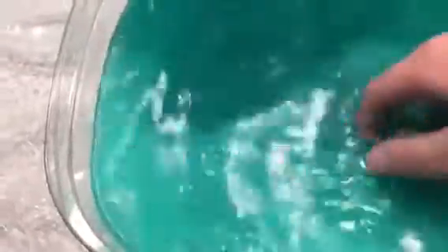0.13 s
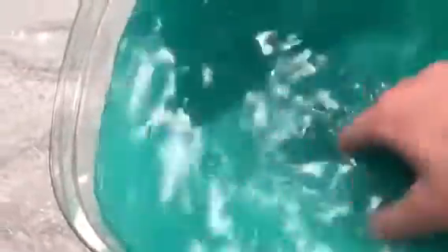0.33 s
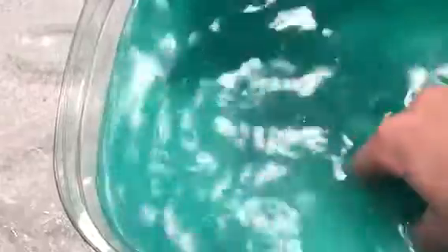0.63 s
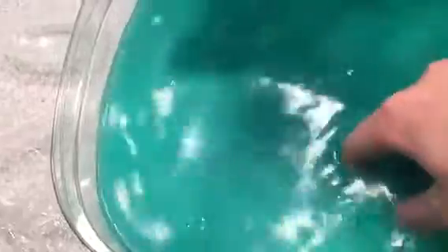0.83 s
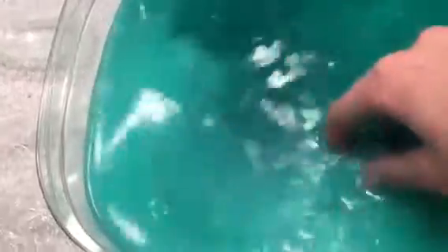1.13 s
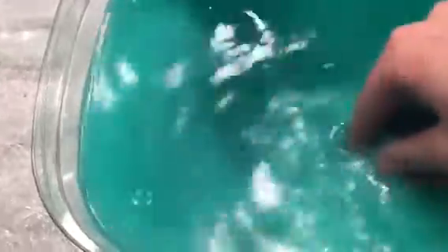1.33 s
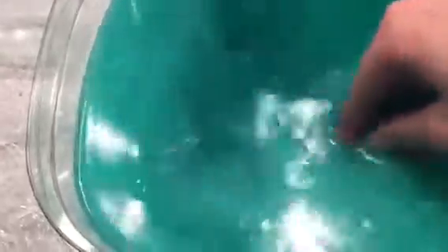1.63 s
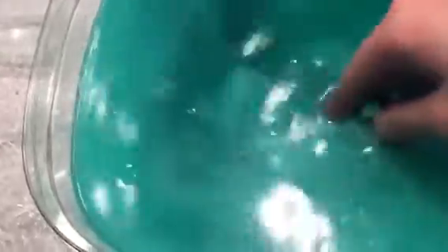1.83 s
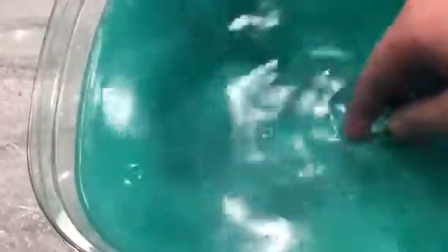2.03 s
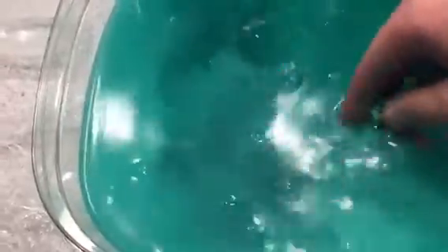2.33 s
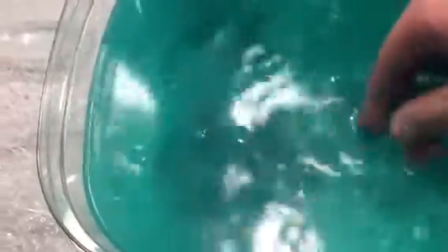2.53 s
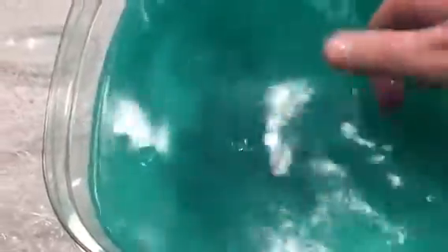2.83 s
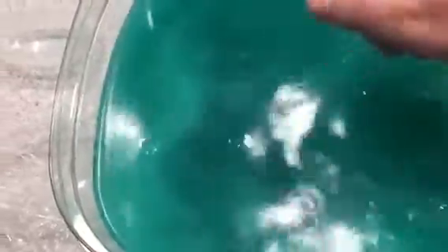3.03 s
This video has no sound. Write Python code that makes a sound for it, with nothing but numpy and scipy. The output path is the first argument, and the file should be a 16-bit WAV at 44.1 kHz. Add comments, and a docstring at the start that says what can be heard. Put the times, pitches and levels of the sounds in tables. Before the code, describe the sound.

A bath bomb fizzes as a steady bright hiss in a glass bowl; fingers stir short bubbly sloshes and plops, then lift out with high drips. Quiet room, one close microphone, mono.

```python
"""From the start a bath bomb fizzes in a glass bowl of water, in a quiet room: filtered noise and a low hum.
Soon fingers stir the water. Random bursts ring in resonances to make short sloshes of bubbles, gliding sines
make single plops, and narrow bands of noise make air pockets sing, or the bowl's tone near 1 kHz ring on, for a
moment. At the end the hand lifts out, with a thin trickle of drips: more bursts and high plops. One microphone
hears it all; both channels carry the same sound."""
import sys
import numpy as np
from scipy import signal
from scipy.io import wavfile
from scipy.ndimage import uniform_filter1d

SR = 44100
rng = np.random.default_rng(int(sys.argv[2]) if len(sys.argv) > 2 else 0)


def bounce(signal):
    """Save signal as a 16-bit WAV file at the path given by the first command-line argument."""
    frames = np.transpose(np.atleast_2d(signal))
    limited = np.clip(frames, -1, 1)
    pcm = np.round(limited * 32767).astype(np.int16)
    wavfile.write(sys.argv[1], SR, pcm)


N = 141120  # samples: 3.2 s

EVEN_HZ = 9000  # around here and above, the hiss becomes less patchy
BURSTS_PER_S, BURST_SPREAD_DB = 2000, 2.5
SKIRT = 1.6  # width of the second resonance, as a multiple of the first


def amp(db):
    """Turn decibels into a plain factor."""
    return 10 ** (np.asarray(db) / 20)


def evened(x):
    """Scale a sound to an average (RMS) strength of 1."""
    return x / np.sqrt(np.mean(x ** 2) + 1e-20)


def read(points, hz):
    """Read a curve between its points, on a logarithmic pitch scale."""
    f, value = np.transpose(points)
    return np.interp(np.log(hz + 1), np.log(f + 1), value)


def add(mix, start_s, sound):
    """Mix a sound in at its start time, cut off at the end of the mix."""
    part = mix[round(start_s * SR):][:len(sound)]
    part += sound[:len(part)]


def resonate(x, hz, width):
    """A resonance of gain 1 that may follow a pitch curve: shift down to 0 Hz, smooth, shift back."""
    turn = np.exp(2j * np.pi * np.cumsum(hz * np.ones(len(x))) / SR)
    r = np.exp(-np.pi * width / SR)
    smoothed = signal.lfilter([1 - r], [1, -r], x / turn)
    return 2 * (turn * smoothed).real


def noise(field_db, patchy_db):
    """Random short spectra, shaped over pitch and time, with small patches that even out in the treble."""
    hz = np.fft.rfftfreq(1024, 1 / SR)[:, None]
    t = np.arange(N // 256 + 5) * 256 / SR
    a, b, patches = rng.standard_normal((len(t), 513, 3)).T
    patches = uniform_filter1d(patches, size=5, axis=0)  # blur over pitch
    patches = evened(uniform_filter1d(patches, size=12, axis=1))  # blur over time
    patches_db = patchy_db * patches / (1 + (hz / EVEN_HZ) ** 2)
    spectra = (a + 1j * b) * amp(field_db(hz, t) + patches_db)
    return signal.istft(spectra, nperseg=1024, noverlap=768)[1][:N]


def clicks(per_s, spread_db):
    """Random bubble bursts of either sign; a few are large."""
    extra_db = spread_db * np.minimum(rng.exponential(1, N), 4)
    size = amp(extra_db) * rng.standard_normal(N)
    return size * (rng.random(N) < per_s / SR)


def ring(modes, strength):
    """Bubble bursts that follow a strength curve ring several resonances, each with its own bursts."""
    out = 0
    for hz, width, db in modes:
        bursts = strength * evened(clicks(BURSTS_PER_S, BURST_SPREAD_DB))
        tone = resonate(resonate(bursts, hz, width), hz, SKIRT * width)
        power = np.pi * width * SKIRT / (1 + SKIRT) / SR  # share of noise power that passes
        out = out + amp(db) * tone / np.sqrt(power)
    return out / np.linalg.norm(amp(np.transpose(modes)[2]))


# tone colour of the quiet room: f/Hz, relative level/dB per Hz
ROOM_COLOUR = [(25, -22), (53, -12), (82, -2), (114, -5.5), (243, -9.5), (331, -15), (372, -10),
               (452, -19.5), (2600, -17)]
ROOM_DB = -66.5
# hum of the room: f/Hz, width/Hz, level/dB, steady share (0-1)
ROOM_HUM = [(85, 8, -67, .6), (240, 2, -76, .9)]


def room():
    """Low room noise, with a hum that mixes steady sines and wavering narrow bands of noise."""
    hum = 0
    for hz, width, db, steady in ROOM_HUM:
        waver = resonate(rng.standard_normal(N), hz, width)
        waver = evened(resonate(waver, hz, 2.3 * width))
        tone = evened(np.sin(2 * np.pi * (hz * np.arange(N) / SR + rng.random())))
        hum = hum + amp(db) * (steady * tone + np.sqrt(1 - steady ** 2) * waver)

    def field_db(hz, t):
        return read(ROOM_COLOUR, hz) - 40 * (hz > 2600)

    return hum + amp(ROOM_DB) * evened(noise(field_db, patchy_db=1.4))


COARSE_HZ, COARSE_OCT = 4730, .33  # centre and width of the coarse bubbles, Hz and octaves
MEDIUM_HZ, MEDIUM_OCT = 6220, .25  # the same for medium bubbles
# tone colour of the fizz: f/Hz, relative level/dB per Hz
FIZZ_COLOUR = [(1800, -25), (2080, -26.5), (2800, -11), (3140, -11), (3400, -7.5), (3680, -9.5), (4650, -6),
               (5040, -7.5), (6650, 2), (7470, 0), (8470, 2), (9270, 3), (10200, -1), (11400, 1.5),
               (15300, 1)]
# course of the fizz: t/s, level/dB, extra level/dB of coarse bubbles, extra level/dB of medium ones
FIZZ_COURSE = [(0, -49, 1.5, 0.5), (.25, -49.5, 0.5, 2.5), (.5, -49, -3, 3.5), (.62, -50.5, -1.5, 1.5),
               (.95, -48.5, 3, -3), (1.05, -49, 1, 2), (1.35, -47.5, 1, -0.5), (1.6, -49, 4, -0.5),
               (1.93, -47.5, 4, -2), (2.04, -46.5, 5, 1), (2.12, -49, 3.5, 2), (2.35, -49.5, 5, 0.5),
               (2.5, -48.5, -2, 0), (2.8, -49, 0.5, -1), (3.0, -49.5, 4.5, -3), (3.2, -50, -6, -2)]


def fizz():
    """Countless tiny bubbles merge into a hiss; the coarser ones come and go."""
    s, level_db, coarse_db, medium_db = np.transpose(FIZZ_COURSE)

    def bump(hz, centre_hz, octaves):
        return np.exp(-.5 * (np.log2((hz + 1) / centre_hz) / octaves) ** 2)

    def field_db(hz, t):
        colour = read(FIZZ_COLOUR, hz) - 40 * (hz < 1800)
        coarse = bump(hz, COARSE_HZ, COARSE_OCT) * np.interp(t, s, coarse_db)
        medium = bump(hz, MEDIUM_HZ, MEDIUM_OCT) * np.interp(t, s, medium_db)
        return colour + coarse + medium

    level = amp(np.interp(np.arange(N) / SR, s, level_db))
    return level * evened(noise(field_db, patchy_db=3.0))


SING_WIDTH = .045  # width of the resonance, as a share of the starting pitch
# narrow tones that sing for a moment, from air pockets and from the bowl ringing on near 1 kHz: t/s, length/s,
# level/dB, f/Hz at the start, f/Hz at the end
SINGING_TONES = [(0.711, 0.11, -65.5, 3050, 3300), (1.238, 0.09, -64.5, 950, 980),
                 (0.532, 0.15, -58, 1056, 1030), (0.757, 0.15, -61, 980, 1022),
                 (2.047, 0.052, -63.5, 1340, 1460), (2.063, 0.22, -64.5, 3390, 3500),
                 (2.118, 0.16, -72.5, 381, 399), (2.469, 0.081, -74, 360, 390),
                 (2.971, 0.078, -62, 4470, 4440)]


def singing():
    """An air pocket sings, or the bowl's tone rings on: noise in one narrow, gliding resonance swells and
    fades."""
    out = np.zeros(N)
    for start, length, db, hz, end_hz in SINGING_TONES:
        u = np.arange(0, length, 1 / SR) / length
        pitch = hz + (end_hz - hz) * u
        air = rng.standard_normal(len(u))
        tone = resonate(air, pitch, SING_WIDTH * hz)
        tone = resonate(tone, pitch, 5.1 * SING_WIDTH * hz)
        add(out, start, amp(db) * np.sin(np.pi * u) ** 0.28 * evened(tone))
    return out


# resonances of the small drips: f/Hz, width/Hz, relative level/dB
DRIP_TONES = [(4200, 470, 3), (3740, 600, 5), (3380, 540, 2.5), (2690, 360, -5)]
# trickle off the fingers: t/s, level/dB
TRICKLE_COURSE = [(2.76, -80), (2.87, -62.5), (2.95, -73), (3.0, -71), (3.04, -60), (3.06, -51),
                  (3.1, -57.5), (3.15, -64.5), (3.2, -61)]


def trickle():
    """Small drips run off the lifted fingers: random bursts ring a few high resonances."""
    s, db = np.transpose(TRICKLE_COURSE)
    t = np.arange(N) / SR
    strength = (t > s[0]) * amp(np.interp(t, s, db))
    return ring(DRIP_TONES, strength)


CYCLES_AT_1K, CYCLES_POWER = 6.8, 0.075  # smaller bubbles ring for more cycles
GLIDE = 0.0067  # pitch rise per unit of u, as a share of the pitch
SNAP_S, SNAP_HZ, SNAP_WIDTH_HZ, SNAP_DB = 0.00084, 2050, 2400, -23  # SNAP_DB is relative to the bubble
# single bubbles and drips: t/s, peak level/dB (roughly), f/Hz
SINGLE_BUBBLES = [(0.183, -57.5, 905), (0.533, -40.5, 1035), (0.531, -54, 520), (0.586, -52, 353),
                  (0.589, -44.5, 950), (0.605, -47, 1290), (0.609, -52, 130), (0.645, -35.5, 1410),
                  (0.706, -57, 422), (0.788, -53.5, 1350), (0.809, -48, 986), (0.877, -44, 1440),
                  (0.906, -50, 1006), (1.03, -50, 1120), (1.138, -47.5, 1560), (1.314, -50, 1250),
                  (1.316, -51, 4300), (1.338, -49, 1690), (1.339, -49, 3080), (1.965, -47, 1250),
                  (1.965, -48.5, 2050), (2.034, -47.5, 1380), (2.045, -43.5, 1360), (2.172, -53.5, 1330),
                  (2.208, -54, 1380), (3.0097, -35.5, 4070), (3.013, -46, 3020), (3.025, -48, 1310),
                  (3.0257, -31.5, 4310), (3.05, -52, 4100), (3.0622, -42.5, 4050), (3.08, -49, 4000),
                  (3.102, -47, 2920), (3.121, -49, 3860), (3.129, -53.5, 2600)]


def bubbles():
    """Each bubble snaps and rings as a sine that rises a little in pitch and dies in a few cycles."""
    out = np.zeros(N)
    t = np.arange(300) / SR
    snap_shape = t / SNAP_S * np.exp(1 - t / SNAP_S)
    for s, db, hz in SINGLE_BUBBLES:
        cycles = CYCLES_AT_1K * (hz / 1000) ** CYCLES_POWER
        u = np.arange(0, 3.0 * cycles / hz, 1 / SR) * hz / cycles  # time, 0 to 3
        shape = 3.05 * u * np.exp(1 - 2.85 * u)
        turns = cycles * (u * (1 - GLIDE / 2) + GLIDE * u ** 2 / 2)
        add(out, s, amp(db) * shape * np.sin(2 * np.pi * turns))
        snap = resonate(rng.standard_normal(300), SNAP_HZ, SNAP_WIDTH_HZ)
        snap = evened(resonate(snap, SNAP_HZ, SNAP_WIDTH_HZ))
        add(out, s, amp(db + SNAP_DB) * snap * snap_shape)
    return out


PEAK_AT = 0.33  # share of its length after which a slosh is loudest
SOFT = 1.1  # roundness of a slosh
# resonances of the bowl: f/Hz, width/Hz, relative level/dB
BOWL_TONES = [(923, 110, -1), (1029, 110, 3), (1197, 210, 4), (1329, 160, 4), (1430, 190, 6.5),
              (1680, 200, 4), (1950, 700, 4.5)]
# resonances of the low push: f/Hz, width/Hz, relative level/dB
PUSH_TONES = [(206, 130, -9), (345, 77, -4.5), (420, 44, -4), (531, 63, -4.5), (720, 360, -1)]
# resonances of the bright spray: f/Hz, width/Hz, relative level/dB
SPRAY_TONES = [(2647, 580, 13.5), (3060, 440, 15), (4120, 150, 12)]
# finger strokes: t/s, length/s, level/dB, low push/dB and bright spray/dB relative to that level
STROKES = [(0.178, 0.047, -65.5, -6, -31), (0.483, 0.069, -62.5, -6, -20), (0.523, 0.058, -57.5, -5, -8.5),
           (0.56, 0.15, -47.5, -6.5, -13), (0.696, 0.023, -55, -3, -28), (0.704, 0.15, -60.5, -6.5, -25),
           (0.774, 0.083, -53.5, -6, -17), (0.846, 0.067, -58.5, -8, -5), (0.893, 0.045, -58, -10, -21),
           (0.941, 0.064, -63.5, -10.5, -20), (0.997, 0.079, -53, -9.5, -7), (1.109, 0.075, -62, -14, -7.5),
           (1.226, 0.089, -60, -8.5, -17), (1.316, 0.013, -54.5, -12.5, -13), (1.33, 0.059, -57, -14, -1.5),
           (1.679, 0.041, -64.5, -23, -21), (1.954, 0.036, -60, -28, -0.5),
           (2.007, 0.085, -57.5, -31, -5.5), (2.126, 0.043, -61, -19, -15), (2.16, 0.13, -68, -35, -16)]


def sloshes():
    """Each stroke of the fingers swells and fades; its bubble bursts ring bowl, low push and spray."""
    body, low, high = np.zeros((3, N))
    bend = np.log(.5) / np.log(PEAK_AT)  # moves the top of the swell to PEAK_AT
    for start, length, db, push_db, spray_db in STROKES:
        u = np.arange(0, length, 1 / SR) / length
        swell = amp(db) * np.sin(np.pi * u ** bend) ** SOFT
        add(body, start, swell)
        add(low, start, swell * amp(push_db))
        add(high, start, swell * amp(spray_db))
    return ring(BOWL_TONES, body) + ring(PUSH_TONES, low) + ring(SPRAY_TONES, high)


ECHO_DB, ECHO_T60_S = -13, .07  # level, and seconds to fade by 60 dB


def echo(water):
    """A short echo: the sound smeared by noise that starts 100 samples late and dies away."""
    tail = np.zeros(4000)
    fade = amp(-60 * np.arange(3900) / SR / ECHO_T60_S)
    tail[100:] = rng.standard_normal(3900) * fade
    return amp(ECHO_DB) * signal.oaconvolve(water, tail / np.linalg.norm(tail))[:N]


def scene():
    """Mix the water and its echo with the fizz and the room, the same in both channels."""
    water = sloshes() + bubbles() + trickle() + singing()
    mono = water + echo(water) + fizz() + room()
    return np.array([mono, mono])


EDGE_HZ = 15720  # upper limit of the sound


def record(dry):
    """The microphone drops the deepest bass, below 40 Hz; then a steep filter cuts the top."""
    bass_cut = signal.butter(2, 40 * 2 / SR, "high", output="sos")
    thin = signal.sosfilt(bass_cut, dry)
    top_cut = signal.firwin(1023, EDGE_HZ, window=("kaiser", 10), fs=SR)
    return signal.oaconvolve(thin, top_cut[None], "same")


dry = scene()
out = record(dry)
bounce(out)
```